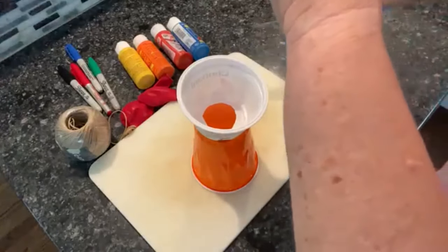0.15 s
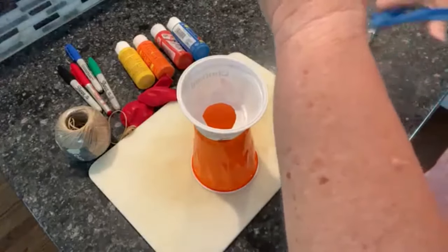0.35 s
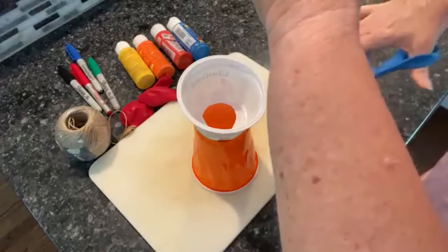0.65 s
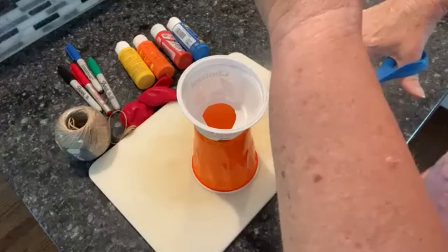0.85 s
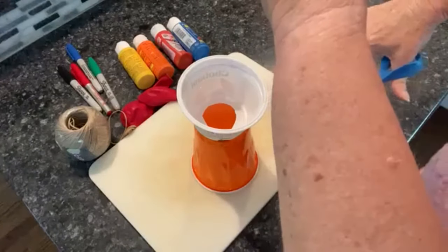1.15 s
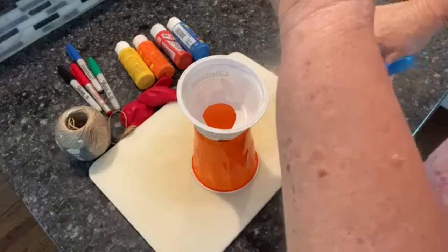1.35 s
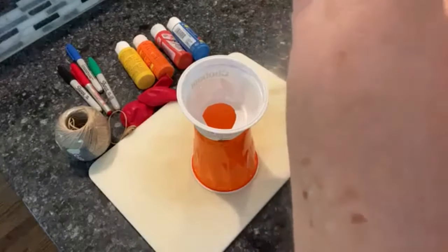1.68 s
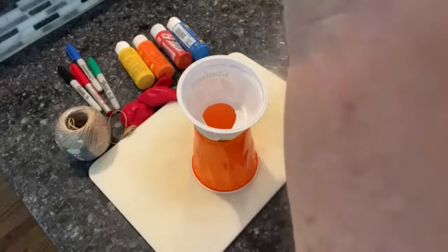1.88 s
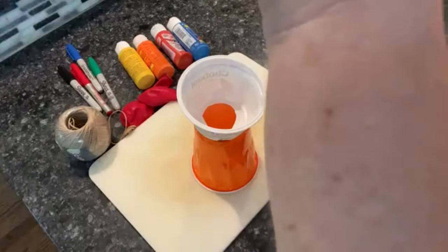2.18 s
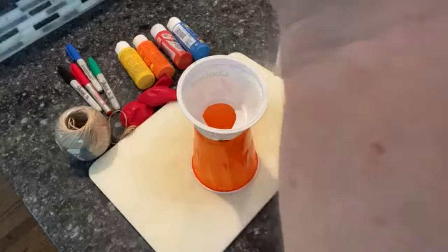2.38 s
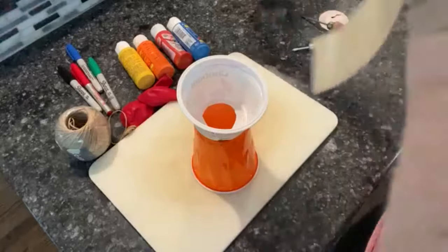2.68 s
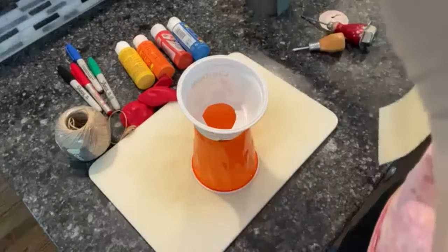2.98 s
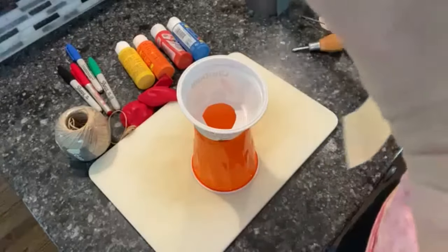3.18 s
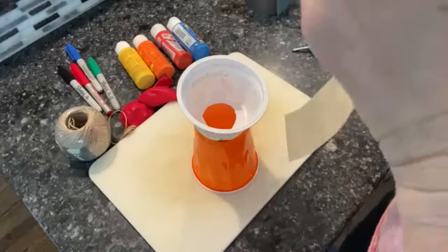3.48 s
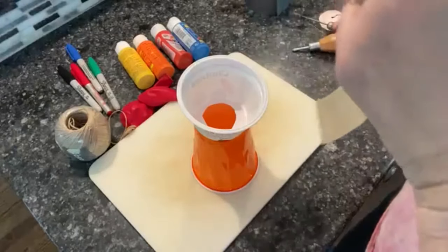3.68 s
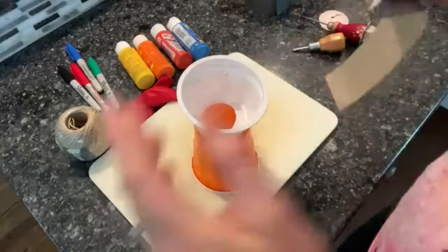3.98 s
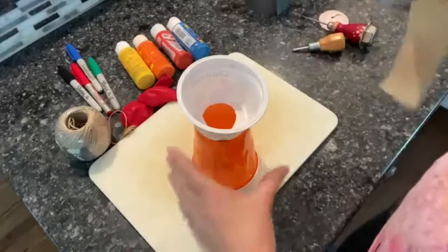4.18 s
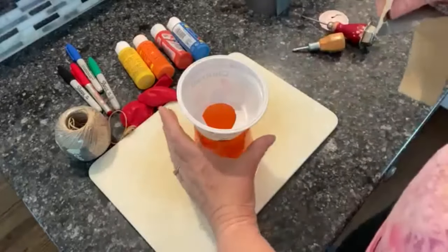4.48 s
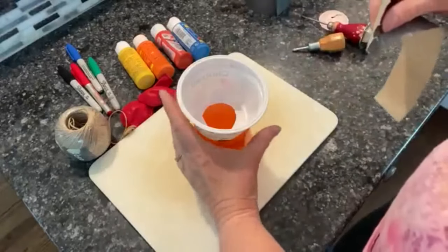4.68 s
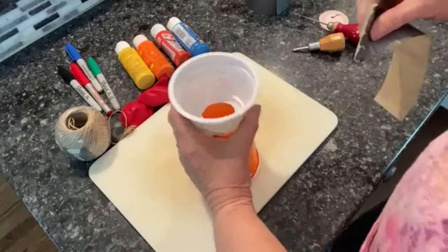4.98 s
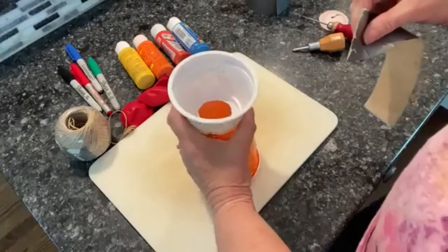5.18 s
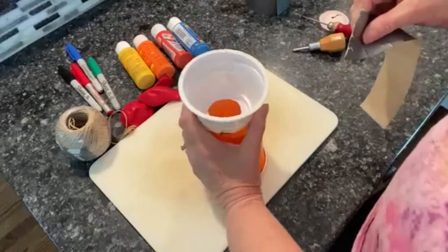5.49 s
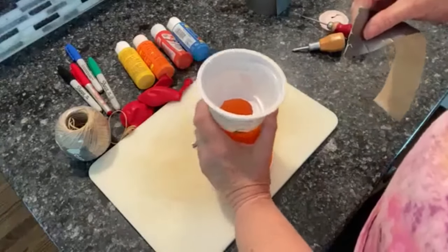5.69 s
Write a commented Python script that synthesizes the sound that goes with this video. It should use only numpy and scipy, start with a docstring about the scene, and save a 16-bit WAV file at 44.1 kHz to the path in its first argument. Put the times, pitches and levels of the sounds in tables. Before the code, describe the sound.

Close stereo in a hard-walled kitchen, over steady soft air noise, low wavering hum and a very faint high whine. At 0 s sticky tape rips off the roll in a fast, bright, whistling rasp with snaps, gone by about 0.3 s. From 1.15 to 1.65 s the strip crinkles with small dry snaps and thin high squeaks, ending in two faint bumps. Near quiet follows. At 2.7 s a soft low cabinet shudder leads into a run of dull counter bumps from 2.8 to 3.0 s; a harder, sharp knock with rattling follows at 3.24 s. At 3.8-3.9 s tape crackles and gives one very loud, bright snap with a tiny squeal. Small snaps continue to 4.25 s, with a soft bump at 4.33 s. Light rim taps come at 4.93 s, tape crackle around 5.2 s, then a strong hollow cup knock at 5.23 s, ringing briefly, with gentle sliding, ticks and crinkles to the end.

```python
"""Sticky tape rasps off its roll, then crinkles, snaps and squeals in the hands, close by in stereo.
Tape is random glue slips driving film resonances; bumps on a counter and knocks on a hollow cup are
short pushes that ring decaying modes; sliding on the cups is slip noise through rim and air resonances.
Close echoes and a hard-walled kitchen answer, over a steady bed of air noise, low hum and faint whine."""
import sys
import numpy as np
from scipy import signal
from scipy.fft import rfft, irfft, next_fast_len
from scipy.io import wavfile
from scipy.ndimage import uniform_filter1d

SR = 44100
rng = np.random.default_rng(int(sys.argv[2]) if len(sys.argv) > 2 else 0)


def generate_wav(sig):
    """Save sig (samples, or channels by samples) to the path in sys.argv[1] as 16-bit PCM at SR."""
    pcm = np.round(np.clip(np.atleast_2d(sig).T, -1, 1) * 32767).astype(np.int16)
    wavfile.write(sys.argv[1], SR, pcm)


N = 257984  # samples

# All levels of single sounds are those before the mix in scene().
STROKE_DB = 20  # rise, fall and swell times are counted over this many dB

# Gliding resonances of three short pulls that tear tape off the roll; rows may overlap.
# Each row: peak in seconds, level in dB, rise, hold and fall in seconds, strip pitch from and to in Hz,
# resonance width per pass in Hz, whistle from and to in Hz, whistle against strip in dB.
PULLS = [(0.00092, -32, .001, 0.0027, 0.037, 1150, 1250, 1100, 1840, 2400, -2),
         (0.01, -38, 0.016, 0.0065, 0.048, 350, 540, 210, 1470, 1680, -2),
         (0.066, -35.5, 0.064, 0.023, 0.023, 710, 855, 230, 2800, 2230, -13),
         (0.0955, -35, 0.034, 0.016, 0.011, 1130, 1184, 201, 920, 800, -9),
         (0.144, -39.5, 0.0011, 0.027, 0.04, 820, 820, 160, 2640, 2640, -5.5),
         (0.174, -46, 0.036, 0.017, 0.046, 2710, 3320, 220, 730, 900, -23),
         (0.22, -61, 0.056, 0.015, 0.064, 2800, 3000, 380, 3750, 3700, -8),
         (0.145, -49, .004, 0.025, .04, 6400, 6300, 700, 7400, 8700, -3),
         (0.0011, -35, 0.00078, 0.011, 0.061, 4300, 3800, 640, 2980, 3060, -0.5)]
# Spectrum of the tearing fizz. Each row: frequency in Hz, relative level in dB per Hz.
RIP_FIZZ = [(600, -11.5), (1500, -10), (2200, -6.5), (3200, -5.5), (4300, -8.5), (5500, -5), (6500, -7.5),
            (8100, -8.5), (9800, -19), (10900, -22), (11400, -13), (13800, -17), (15000, -47)]
# Fizz level along the tear, before its throb. Each row: time in seconds, level in dB.
RIP_FIZZ_LEVEL = [(0, -29), (.015, -62), (.05, -48), (.1, -61), (.115, -45), (.138, -47), (.145, -43),
                  (.21, -47.5), (.26, -54.5), (.33, -65.5), (.45, -75.5), (.6, -104)]


def rip(mix):
    """Slips drive the taut strip and a whistle at the tear, both gliding along each row, and fizz."""
    t, fizz_db = curve(RIP_FIZZ_LEVEL)
    drive = slips(len(t), per_s=2500, spread_db=4.5, hiss=0.5)
    throb = 1 + 0.27 * np.cos(2 * np.pi * 75 * (t - .147))  # the glue lets go in bursts
    fizz = amp(fizz_db) * throb * colour(drive, RIP_FIZZ)
    add(mix, t[0], fizz, pan_db=1.5, lag=lag_at(t[0]))
    for *shape, from_hz, to_hz, width, whistle_from_hz, whistle_to_hz, whistle_db in PULLS:
        start, gain, way = stroke(*shape)
        pull = during(drive, start, gain)
        hz = from_hz + (to_hz - from_hz) * way
        whistle_hz = whistle_from_hz + (whistle_to_hz - whistle_from_hz) * way
        fixed_body = 0.15 * resonate(pull, 690, 780)
        strip = evened(resonate(resonate(pull, hz, width), hz, width) + fixed_body)
        whistle = evened(resonate(resonate(pull, whistle_hz, 520), whistle_hz, 500))
        add(mix, start, gain * (strip + amp(whistle_db) * whistle), pan_db=1.0, lag=lag_at(start))


# Bright and pressed spectra of rubbed tape. Each row: frequency in Hz, relative level in dB per Hz.
RUB_BRIGHT = [(880, -25.5), (1500, -5.5), (3210, -2.5), (4000, -0.5), (5100, 0), (6810, -5), (7870, -4),
              (9630, -3.5), (10600, -52.5), (11000, -6), (12900, -2), (15000, -22)]
RUB_DULL = [(180, -41.5), (300, -7.5), (515, 13), (884, 3.5), (2320, -5), (3120, -11), (9030, -13.5),
            (10600, -51), (13200, -34.5), (15000, -44.5)]


def strip_ends():
    """Both ends of the strip crackle, each in its bright and its pressed colour, with a shared flutter."""
    count = next_fast_len(N + SR // 2, True)
    flutter = amp(2.3 * evened(uniform_filter1d(rng.standard_normal(count), 300)))
    drives = [slips(count, per_s=800, spread_db=3.5, hiss=0.89) * flutter for end in range(2)]
    return [(colour(drive, RUB_BRIGHT), colour(drive, RUB_DULL)) for drive in drives]


# Fingers peel and rub the tape. Each row: peak in seconds, level in dB, rise, hold and fall in seconds,
# dullness from 0 to 1.
RUBS = [(1.15, -71, 0.016, 0.26, 0.13, 0), (1.312, -57, 0.12, 0.083, 0.1, 0),
        (1.431, -56, 0.069, 0.017, 0.037, 0.9), (1.612, -54.5, 0.071, 0, 0.14, 0.5),
        (2.836, -78, 0.043, 0.084, .1, 0), (2.948, -71, 0.061, 0.023, 0.16, 0),
        (3.106, -65.5, 0.027, 0.015, 0.11, 0.6), (3.242, -54, 0.0063, 0.031, 0.1, 0.62),
        (3.385, -68.5, 0.087, 0, 0.044, 0.5), (3.829, -55.5, 0.073, 0.02, .05, 0.56),
        (3.875, -39, 0.0073, 0, 0.076, 0.7), (3.98, -66.5, 0.14, 0.3, 0.21, 0.54),
        (4.44, -72, 0.1, 0.0095, .04, .05), (4.812, -60.5, 0.037, 0.084, .05, 0.9),
        (4.938, -67, .02, 0.033, 0.027, 0.6), (4.97, -63, 0.03, 0.091, 0.026, 0.8),
        (5.132, -53, 0.013, 0.018, .02, 0.66), (5.183, -39.5, 0.019, 0.012, 0.072, 0.64),
        (5.304, -56.5, 0.09, 0.19, 0.076, 1), (5.536, -67, 0.12, 0.029, 0.072, .3),
        (5.691, -49.5, 0.14, 0.022, 0.095, 0.52), (5.8, -62, 0.072, 0, .09, 0.7)]


def rub(mix, ends, s, peak_db, rise, hold, fall, dull):
    """Fingers on tape: an uneven crackle; it dulls when the whole strip is pressed."""
    start, gain, _ = stroke(s, peak_db, rise, hold, fall)
    dull = np.clip(dull, 0, 1)
    for (bright, pressed), pan_db, lag in zip(ends, (-.3, .26), (lag_at(s), 0)):
        sound = (1 - dull) * during(bright, start, gain) + dull * during(pressed, start, gain)
        add(mix, start, gain * sound / np.sqrt(2), pan_db, lag)


# The film squeals on some strokes. Each row: peak in seconds, level in dB, rise, hold and fall in seconds,
# pitch from and to in Hz.
SQUEALS = [(1.272, -57.5, 0.04, 0.093, 0.01, 6600, 13800), (1.61, -59, .01, 0.0051, 0.053, 4860, 5070),
           (1.603, -57.5, 0.018, 0.012, 0.063, 8200, 8450), (3.385, -73, .03, 0, 0.032, 8400, 8200),
           (3.878, -30.5, 0.0016, 0, 0.0081, 8360, 8250), (4.45, -67, 0.038, 0, .03, 12600, 12700)]


def squeal(mix, drive, s, peak_db, rise, hold, fall, from_hz, to_hz):
    """Slips ring one gliding resonance of the stretched film."""
    start, gain, way = stroke(s, peak_db, rise, hold, fall)
    hz = from_hz + (to_hz - from_hz) * way
    tone = evened(resonate(resonate(during(drive, start, gain), hz, 600), hz, 600))
    add(mix, start, gain * tone, lag=lag_at(s))


# Tape snaps and crinkles, and a few crackles at the cup taps and knock. Each row: release in seconds,
# film peak in dB, body against film in dB, left-right balance in dB, swell in seconds, drive t60 in seconds.
SNAPS = [(0.117, -32, -11, 2, .002, .016), (.1435, -28, 2, 7, .001, .025),
         (1.149, -51, -14.5, 1, .003, .016), (1.176, -47, -13, -2, .004, .016),
         (1.202, -41, -28, 1, 0.0049, 0.018), (1.212, -47, -16, -2, .003, .012),
         (1.221, -46, -16, -1, .003, .016), (1.237, -43, -16, 0, .003, .014),
         (1.262, -46, -16, -3, .003, .014), (1.270, -42, -18, 0, .003, .014),
         (1.294, -47, -20, -2, .003, .014), (1.301, -41, -22, -2, .003, .014),
         (1.342, -37, -14, 0, .003, .016), (1.414, -33, -8, 1, 0.0055, .016),
         (1.555, -40.5, -12, 1, 0.0016, 0.014), (1.607, -35, -29, 4, .005, .016),
         (2.074, -65, 15, 1, .005, .01), (3.789, -43.5, 1.5, 0, .002, 0.013),
         (3.816, -29, -12, -1, 0.0019, 0.026), (3.867, -30, -15, 1, .004, .016),
         (3.8793, -13, -13.5, -3, 0.006, 0.022), (3.882, -26, -13, -11, .002, .04),
         (3.895, -29, -22, 4, .004, .016), (4.094, -38, -9, -3, 0.0018, .012),
         (4.12, -38, -8, 1, .002, 0.01), (4.1665, -46, -4, -8, 0.0044, .016),
         (4.247, -45, 7, -1, .003, .02), (4.251, -33, -13, -1, 0.006, 0.021),
         (4.9292, -46, 14.5, -1, 0.0077, 0.033), (4.974, -52, 16, -5, 0.0085, 0.027),
         (5.044, -43.5, 4.5, -1, .004, 0.047), (5.183, -36.5, 4.5, -1, .006, .03),
         (5.229, -28.5, 10.5, -2.5, 0.0036, 0.024), (5.497, -38.5, -3, 1, 0.0022, .016),
         (5.5345, -28.5, -18, -5, 0.0017, 0.02), (5.771, -32, -7, 1, .0015, 0.023)]
# Resonances of the film (before its random stretch) and of the body.
# Each row: frequency in Hz, width in Hz, drive into it in dB.
SNAP_FILM = [(4240, 560, -0.5), (6520, 2000, 0), (8700, 4300, -3), (13500, 1200, -7)]
SNAP_BODY = [(860, 370, 0), (2050, 340, -1), (2505, 140, 4), (3140, 1600, -2)]


def snap(mix, s, peak_db, body_db, pan_db, swell, t60):
    """Slips swell for a few ms to one sharp release and die away, ringing a film and a lower body."""
    t = np.arange(-.01, .15, 1 / SR)
    swelling = amp(STROKE_DB * t / max(swell, .0005))
    shape = np.where(t < 0, swelling, amp(-60 * t / max(t60, .005)))
    release = 7.8 * (abs(t) < .5 / SR)
    drive = (evened(slips(len(t), per_s=900, spread_db=4.5, hiss=0.64)) + release) * shape
    taut = rng.uniform(0.93, 0.993)  # each piece of film is stretched differently
    film = modes(drive, [(hz * taut, width, db) for hz, width, db in SNAP_FILM])
    body = modes(drive, SNAP_BODY)
    sound = amp(peak_db) * (film / abs(film).max() + amp(body_db) * body / abs(body).max())
    add(mix, s + t[0], sound, pan_db, lag=lag_at(s))


# Place of the tape hand. Each row: time in seconds, lateness of the left side in samples.
HAND = [(0, 4), (3.6, 4), (3.7, -4), (4.0, -4), (4.6, 4)]


def lag_at(s):
    """Left-side delay in samples for a sound from the tape hand; negative means the right is late."""
    return round(np.interp(s, *np.transpose(HAND)))


def strike(mix, ringing, tick_db, tick_hz, s, peak_db, contact, pan_db):
    """A short push rings the modes, high ones first as bending waves travel; a dull tick marks contact."""
    t = np.arange(0, .3, 1 / SR)
    ring = np.zeros(len(t))
    for k, (hz, db, t60) in enumerate(ringing):
        u = np.maximum(t - 0.0489 / np.sqrt(hz), 0)  # seconds since this mode arrived
        ring = ring + (-1) ** k * amp(db - 60 * u / t60) * np.sin(2 * np.pi * hz * u)
    body = signal.fftconvolve(ring, push(t, contact))[:len(t)]
    noise = evened(resonate(rng.standard_normal(len(t)), tick_hz, 6600))
    tick = amp(tick_db - 60 * t / 0.027) * noise
    add(mix, s + 0.00066, amp(peak_db) * (body / abs(body).max() + tick), pan_db)


def push(t, contact):
    """Force of a contact: quick rise to its peak after the contact time (20 us or more), slower fall."""
    u = t[:400] / max(contact, 2e-5)
    return u * np.exp(-u)


# Shaking after a bump. Each row: frequency in Hz, relative level in dB per Hz.
BOOM = [(90, -5), (150, -4.5), (270, -10), (420, 7), (1000, -10), (1500, -18), (2500, -24), (5000, -42)]
BOOM_DB, BOOM_T60_S = -22, 0.17  # dB against the bump, seconds


def boom(mix, s, peak_db, contact, pan_db):
    """Boards and things on the counter shake on after a bump, without pitch; long contacts shake duller."""
    t = np.arange(0, .3, 1 / SR)
    shape = np.minimum(t / 0.011, 1) * amp(peak_db + BOOM_DB - 60 * t / BOOM_T60_S)
    for side_db in (-3., 3.):
        rattle = colour(slips(len(t), per_s=170, spread_db=0.5, hiss=0.43), BOOM)
        noise = evened(signal.fftconvolve(rattle, push(t, contact))[:len(t)])
        add(mix, s, shape * noise, pan_db + side_db)


# Bumps on the counter. Each row: start in seconds, level in dB, contact time in seconds,
# left-right balance in dB.
BUMPS = [(1.619, -44, 0.00039, 3), (1.646, -47, 0.00059, -2), (2.823, -22, 0.00024, 2.5),
         (2.848, -29.5, 0.00042, 5), (2.889, -33.5, 0.00091, 3), (2.909, -39, 0.00037, 2),
         (2.9345, -31, 0.00013, 0), (2.966, -31.5, 0.00011, 1), (2.989, -45, 0.000088, -11),
         (2.999, -39, 0.00063, 1), (3.242, -15, 0.000027, 2), (3.254, -29.5, 0.00012, 5),
         (3.266, -28, 0.00043, 6), (3.276, -35, .0003, 2), (3.293, -34, 0.00016, 0),
         (3.308, -34.5, 0.00061, 3), (3.329, -35, 0.00015, 0), (3.339, -38, 0.000056, 5),
         (3.396, -39.5, .0005, 6), (4.33, -37.5, 0.0012, 2)]
# Modes of the counter. Each row: frequency in Hz, level in dB, t60 in seconds.
COUNTER = [(85, -12.5, 0.035), (150, -5.5, 0.052), (243.6, -4, 0.045), (323.6, 0, 0.026), (460, -4, 0.047),
           (581, 1, 0.018), (675, -9, 0.0032), (813, -1, 0.0092), (926, -1.5, 0.02), (1060, -6.5, 0.035),
           (1190, 1.5, 0.008), (1640, -29, 0.015), (2280, -31, 0.0041), (3190, -27, 0.0048)]


def bump_counter(mix):
    """Each bump rings the modes of the counter and leaves it shaking."""
    for row in BUMPS:
        strike(mix, COUNTER, -39.0, 3500, *row)
        boom(mix, *row)


# A body leans on the cabinet. Each row: peak in seconds, swing level in dB, rise, hold and fall in seconds,
# panel pitch from and to in Hz.
SHUDDER = [(2.675, -44.5, .04, .05, .045, 91, 67)]
# Loose rumble on the panel. Each row: frequency in Hz, relative level in dB per Hz.
SHUDDER_TONE = [(24, -19.5), (40, -4), (101, -8), (130, -6.5), (176, -15), (322, -38), (600, -30),
                (780, -73), (1320, -120)]


def shudder(mix, s, peak_db, rise, hold, fall, from_hz, to_hz):
    """A cabinet panel swings slowly and sags in pitch, with loose rumble riding on it."""
    start, gain, way = stroke(s, peak_db, rise, hold, fall)
    hz = from_hz + (to_hz - from_hz) * way ** 2
    swing = np.sqrt(2) * np.sin(2 * np.pi * np.cumsum(hz) / SR)
    rumble = colour(rng.standard_normal(SR), SHUDDER_TONE)[:len(gain)]
    add(mix, start, gain * (swing + 0.8 * rumble))


# The cup is knocked and rocks. Each row: start in seconds, level in dB, contact time in seconds,
# left-right balance in dB.
KNOCKS = [(5.2253, -10, 0.000077, -2), (5.2423, -39, 0.00045, 0), (5.263, -31, 0.00058, 2),
          (5.306, -37, .0004, -2), (5.594, -44, 0.00087, 1), (5.613, -40, 0.0008, 0),
          (5.7, -45, 0.00038, 3)]
# Modes of the hollow cup. Each row: frequency in Hz, level in dB, t60 in seconds.
CUP = [(204, -10, 0.021), (299, -3.5, 0.018), (435, 1, 0.024), (543, -1.5, 0.019), (680, -1, 0.019),
       (830, 0.5, 0.018), (1084, -15.5, 0.012), (1400, -3.5, 0.0081), (1690, -4.5, 0.0079),
       (1990, -11, 0.011), (3230, -11, 0.057), (3730, -12, 0.025), (4280, -21, 0.014)]
# Light taps on the rim, and the bright crack of the main knock. Each row: start in seconds, level in dB,
# contact time in seconds, left-right balance in dB.
TAPS = [(4.928, -36.5, 0.00005, -8), (4.932, -35.5, 0.00011, 5), (4.939, -42, 0.000073, -3),
        (4.954, -47, .00006, 0), (4.973, -52, 0.000042, -1), (4.982, -45, .00002, 3),
        (5.2295, -24.5, 0.000017, 3), (5.533, -39.5, 0.000018, 0), (5.541, -56, 0.000025, 2.5),
        (5.635, -47, 0.000062, -1), (5.69, -46, .00003, -1)]
# Modes of the rim. Each row: frequency in Hz, level in dB, t60 in seconds.
RIM = [(1110, -18, 0.012), (1650, -9, 0.018), (2020, -3, 0.031), (2200, -16, 0.011), (2610, -8, 0.01),
       (2780, -4, .014), (3350, -3, 0.014), (3640, -3, 0.013), (4440, 0, .008), (5500, -12, 0.0062)]


def knock_cup(mix):
    """Knocks ring the low hollow modes; light taps and the main knock's crack ring the higher rim modes."""
    for row in KNOCKS:
        strike(mix, CUP, -28.5, 3300, *row)
    for row in TAPS:
        strike(mix, RIM, -15.5, 3000, *row)


# One knock leaves the cup wall ringing. The row: start in seconds, level in dB, contact time in seconds,
# left-right balance in dB.
WALL_RING = (5.237, -30.5, .00004, 0)
# Close modes of the cup wall. Each row: frequency in Hz, level in dB, t60 in seconds.
CUP_WALL = [(1631, 0, .21), (1672, -7, .34), (1598, -14, .2), (1475, -11, .27), (1739, -12, .08)]


def ring_cup_wall(mix):
    """Closely spaced modes beat against each other as the wall rings down."""
    strike(mix, CUP_WALL, -40, 3000, *WALL_RING)


# The hand turns and slides the cups. Each row: peak in seconds, rim level in dB, rise, hold and fall in
# seconds, air rumble against rim in dB, thin rim singing against rim in dB.
SLIDE = [(4.95, -54, 0.019, .032, 0.016, -3, -14), (5.304, -65.5, 0.045, 0.072, 0.068, 11.5, -3),
         (5.414, -68, 0.05, 0.036, 0.1, 8.5, 0), (5.49, -66, 0.05, 0.083, .06, 6.5, -0.5),
         (5.599, -64, 0.039, 0.024, 0.054, 15.5, -1), (5.684, -58, 0.037, 0.014, 0.12, 8, 0.5),
         (5.778, -67.5, 0.033, 0.018, 0.087, 8, -2)]
# Resonances of the rim (before the grip bends them) and of the air inside.
# Each row: frequency in Hz, width in Hz, drive into it in dB.
SLIDE_RIM = [(1900, 290, -1), (2680, 300, 3), (4600, 1300, -7)]
SLIDE_HOLLOW = [(233, 365, -5), (384, 110, 4), (867, 99, -7)]
SING_HZ, SING_WIDTH_HZ = 3390, 240


def slide(mix):
    """Skin slips on thin plastic and softly rings the rim and the air inside the cups."""
    drive = slips(2 * SR, per_s=1200, spread_db=3.5, hiss=0.8)
    grip = 1 + .02 * evened(uniform_filter1d(rng.standard_normal(2 * SR), 3000))  # the grip bends the rim
    rim = evened(modes(drive, [(hz * grip, width, db) for hz, width, db in SLIDE_RIM]))
    hollow = evened(modes(drive, SLIDE_HOLLOW))
    sing = evened(resonate(drive, SING_HZ, SING_WIDTH_HZ))
    for *shape, hollow_db, sing_db in SLIDE:
        start, gain, _ = stroke(*shape)
        sound = rim + amp(hollow_db) * hollow + amp(sing_db) * sing
        add(mix, start, gain * during(sound, start % 1, gain), pan_db=-2.0, lag=4)


SHIFT_PER_S = 18.0  # how often per second the moving arms bring other echoes


def nearby(x, level_db, above_hz, below_hz):
    """First echoes off counter, arm and wall, in three sets that take turns as the arms move.

    They are band-limited: bass bends round the obstacles and treble is soaked up."""
    taps = np.zeros((3, 2, 600))
    at = np.arange(30, 530, 25) + rng.integers(0, 25, (3, 2, 20))
    np.put_along_axis(taps, at, rng.choice([-1., 1.], at.shape) * amp(-at / 40), 2)
    taps = amp(level_db) * taps / np.linalg.norm(taps, axis=2)[..., None]
    taps = signal.lfilter(*signal.butter(2, [above_hz, below_hz], "band", fs=SR), taps)
    turn = np.pi * (SHIFT_PER_S * np.arange(N) / SR / 3 + np.arange(3)[:, None] / 3)
    shares = np.cos(turn) ** 2
    shares = shares / np.linalg.norm(shares, axis=0)
    echoes = [signal.oaconvolve(x * share, tap, axes=1)[:, :N] for share, tap in zip(shares, taps)]
    return x + sum(echoes)


# Decay of the kitchen. Each row: frequency in Hz, t60 in seconds.
KITCHEN = [(100, 0.56), (260, 0.32), (700, 0.32), (1840, 0.47), (4850, 0.46), (12000, 0.14)]
# How alike the echoes are on both sides. Each row: frequency in Hz, left-right likeness up to 1.
WALL_SAME = [(100, 0.92), (300, 0.64), (700, 0.041), (3000, 0.1), (9000, 0.34)]


def kitchen(x):
    """Sparse taps of random sign, each band dying at its own speed; low echoes reach both sides alike."""
    taps = np.zeros((2, SR // 2))
    at = np.arange(100, SR // 2 - 20, 20) + rng.integers(0, 20, (2, (SR // 2 - 101) // 20))
    np.put_along_axis(taps, at, rng.choice([-1., 1.], at.shape), 1)
    hz, t, (left, other) = signal.stft(taps, SR, nperseg=512)
    same = np.clip(read(WALL_SAME, hz), 0, 1)[:, None]
    z = np.array([left, same * left + np.sqrt(1 - same ** 2) * other])
    decay = amp(-60 * t / read(KITCHEN, hz)[:, None])
    tail = signal.istft(z * decay, SR, nperseg=512)[1]
    return signal.fftconvolve(x.mean(0)[None], tail / np.linalg.norm(tail[0]), axes=1)[:, :N]


# Spectrum of the kitchen air. Each row: frequency in Hz, relative level in dB per Hz.
AIR = [(33, -35.5), (48, 10), (67, -16), (81, -12), (110, -4.5), (243, -5.5), (415, -11.5), (950, -11),
       (1350, -13.5), (1700, -20), (4400, -34), (5600, -49), (8780, -51), (13500, -56.5), (15000, -71)]
# Stereo of the air. Each row: frequency in Hz, left-right likeness from -1 to 1.
SAME = [(60, 0.69), (180, 1), (540, -0.36), (1630, -0.25), (4890, 0.16), (14700, 0.2)]
# Stereo tilt of the air. Each row: frequency in Hz, left-right balance in dB.
LEAN = [(60, 5.5), (240, 0), (940, -0.5), (3710, 1.5), (14700, -2.5)]
AIR_DB = -51.5


def air():
    """Broad kitchen noise: random short-time spectra with faint drifting patches."""
    frames, hz = N // 512 + 5, np.fft.rfftfreq(2048, 1 / SR)
    a, b, c, d, patches = rng.standard_normal((frames, 1025, 5)).T
    patches = evened(uniform_filter1d(uniform_filter1d(patches, 20, 0), 8, 1))
    same = np.clip(read(SAME, hz), -1, 1)[:, None]
    left, other = a + 1j * b, c + 1j * d
    z = np.array([left, same * left + np.sqrt(1 - same ** 2) * other])
    lean_db = read(LEAN, hz)[:, None] * np.array([.5, -.5])[:, None, None]
    z *= amp(read(AIR, hz)[:, None] + 0.52 * patches + lean_db)
    return amp(AIR_DB) * evened(signal.istft(z, nperseg=2048, noverlap=1536)[1][:, :N])


# Wavering hum of an appliance. Each row: frequency in Hz, width per pass in Hz, level in dB.
HUM = [(58.4, 10, -63), (189, 6.5, -76.5)]


def hum():
    """Noise through narrow low resonances makes fuzzy, wavering lines, the same on both sides."""
    drive = rng.standard_normal(N)
    return sum(amp(db) * evened(resonate(resonate(drive, hz, width), hz, width)) for hz, width, db in HUM)


FAN_HZ, FAN_DB = 4300, -79


def whine():
    """Faint fuzzy whine of an appliance: noise in one narrow resonance, unrelated on the two sides."""
    return amp(FAN_DB) * evened(np.array([resonate(n, FAN_HZ, 260) for n in rng.standard_normal((2, N))]))


def amp(db):
    """dB to gain."""
    return 10 ** (np.asarray(db) / 20)


def evened(x):
    """Scales to rms 1."""
    return x / np.sqrt(np.mean(x ** 2) + 1e-20)


def read(points, hz):
    """Reads a table on a log-frequency axis."""
    f, value = np.transpose(points)
    return np.interp(np.log(hz + 1), np.log(f + 1), value)


def curve(rows):
    """Sample times and the columns of a table along them."""
    s, *columns = np.transpose(rows)
    t = np.arange(s[0], s[-1], 1 / SR)
    return [t] + [np.interp(t, s, c) for c in columns]


def add(mix, s, sound, pan_db=0., lag=0):
    """Places a sound in the stereo mix; lag = samples by which the left side hears it late."""
    for side, late, db in ((0, max(lag, 0), pan_db / 2), (1, max(-lag, 0), -pan_db / 2)):
        part = mix[side, round(s * SR) + late:][:len(sound)]
        part += amp(db) * sound[:len(part)]


def colour(x, points):
    """Gives x the spectrum of a table, rms 1."""
    return evened(irfft(rfft(x) * amp(read(points, np.fft.rfftfreq(len(x), 1 / SR))), len(x)))


def resonate(x, hz, width):
    """Shifts the curve hz down to zero, smooths, and shifts back: a resonance of gain 1."""
    turn = np.exp(2j * np.pi * np.cumsum(hz * np.ones(len(x))) / SR)
    r = np.exp(-np.pi * width / SR)
    return 2 * (turn * signal.lfilter([1 - r], [1, -r], x / turn)).real


def modes(drive, peaks):
    """Passes a drive through a set of resonances, neighbours in opposite phase."""
    return sum((-1) ** k * amp(db) * resonate(drive, hz, width) for k, (hz, width, db) in enumerate(peaks))


def slips(count, per_s, spread_db, hiss):
    """Glue or skin letting go: random clicks of uneven size over a fine hiss."""
    size = amp(spread_db * np.minimum(rng.exponential(1, count), 4)) * rng.choice([-1, 1], count)
    return evened(size * (rng.random(count) < per_s / SR)) + hiss * rng.standard_normal(count)


def stroke(s, peak_db, rise, hold, fall):
    """Attack, hold and release, straight in dB: start time, gain, and progress 0-1 to the end of the fall."""
    rise, hold, fall = max(rise, .001), max(hold, 0), max(fall, .005)
    t = np.arange(max(-1.5 * rise, -s), hold + 2 * fall, 1 / SR)
    gain = amp(peak_db - STROKE_DB * np.maximum(np.maximum(-t / rise, (t - hold) / fall), 0))
    return s + t[0], gain, np.clip((t + rise) / (rise + hold + fall), 0, 1)


def during(x, start, gain):
    """The part of a running noise that lies under a stroke."""
    return x[round(start * SR):][:len(gain)]


def scene():
    """Tape in the hands, blows on counter and cups, the room and its hum."""
    tape, blows, cups, cup_wall = np.zeros((4, 2, N))
    rip(tape)
    ends = strip_ends()
    film = slips(N, per_s=790, spread_db=5.5, hiss=0.87)
    for row in RUBS:
        rub(tape, ends, *row)
    for row in SQUEALS:
        squeal(tape, film, *row)
    for row in SNAPS:
        snap(tape, *row)
    bump_counter(blows)
    for row in SHUDDER:
        shudder(blows, *row)
    ring_cup_wall(cup_wall)
    knock_cup(cups)
    slide(cups)
    close = amp(-3.5) * nearby(tape, -2.0, above_hz=510, below_hz=10000)
    close = close + amp(-1.0) * nearby(blows, -0.27, above_hz=380, below_hz=3400)
    close = close + amp(-1.0) * nearby(cups, 0.0, above_hz=206, below_hz=7900)
    to_room = amp(-10) * cup_wall + amp(-8.0) * tape + amp(-3.5) * blows + amp(-9.0) * cups
    return close + cup_wall + kitchen(to_room) + air() + whine() + hum()


EDGE_HZ = 15150  # upper band limit


def record(dry):
    """Hollows out a band near 10.5 kHz, cuts the deepest bass, then limits the treble."""
    notch = signal.iirnotch(10450, 5.5, SR)
    notched = signal.lfilter(*notch, signal.lfilter(*notch, dry))
    bass_cut = signal.sosfilt(signal.butter(4, 38, "high", fs=SR, output="sos"), notched)
    treble_limit = signal.firwin(511, EDGE_HZ, window=("kaiser", 9), fs=SR)
    return signal.oaconvolve(bass_cut, treble_limit[None], "same")


dry = scene()
out = record(dry)
generate_wav(out)
```